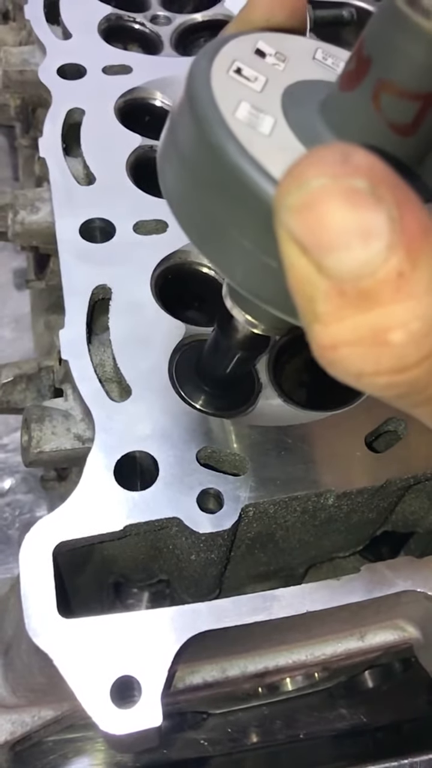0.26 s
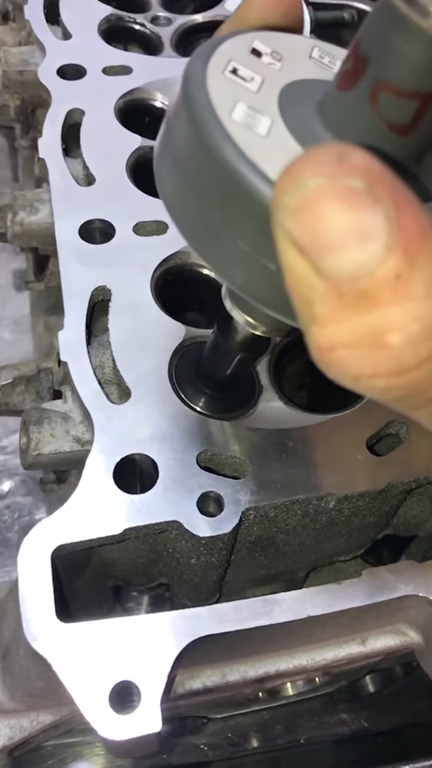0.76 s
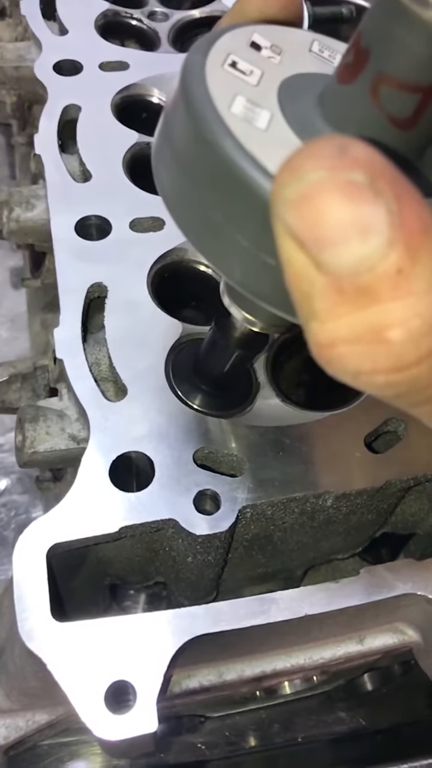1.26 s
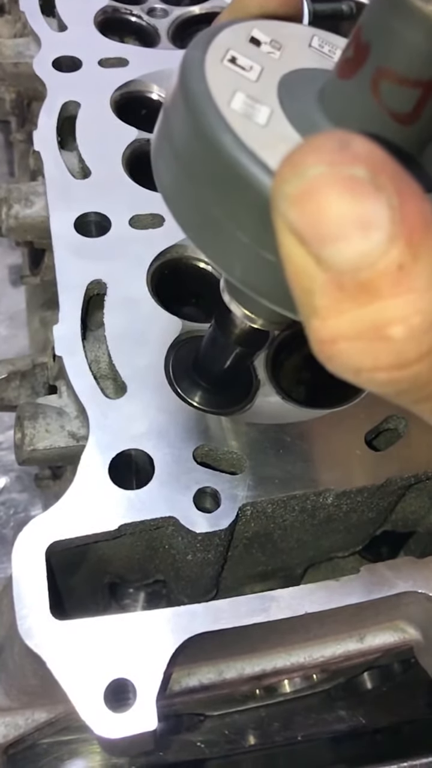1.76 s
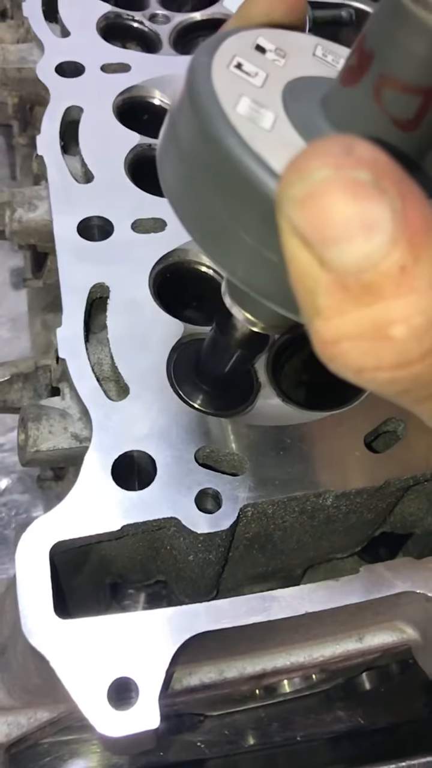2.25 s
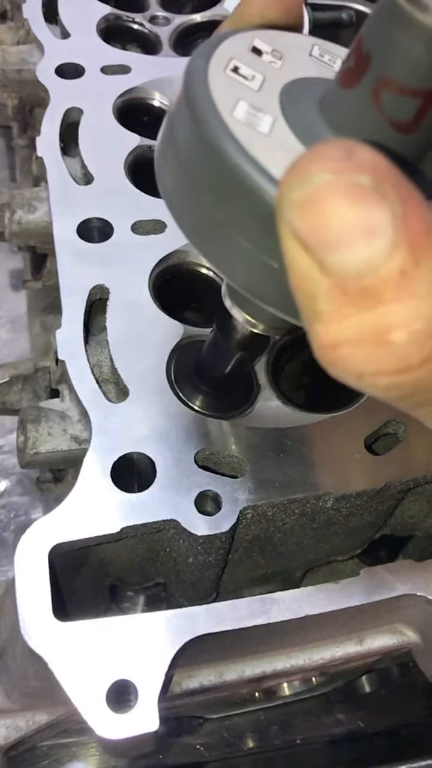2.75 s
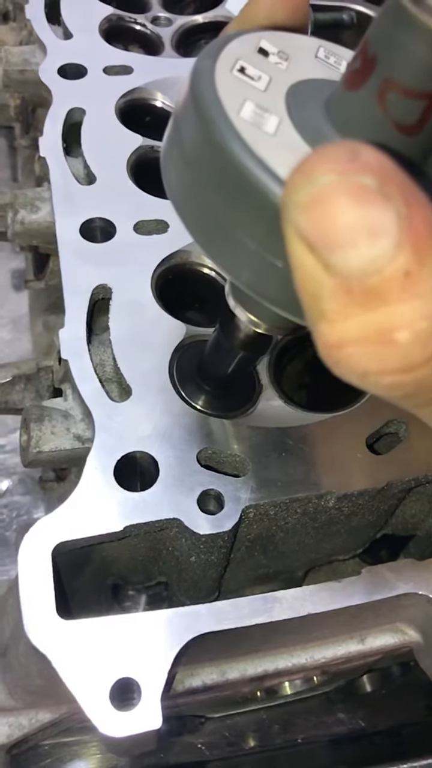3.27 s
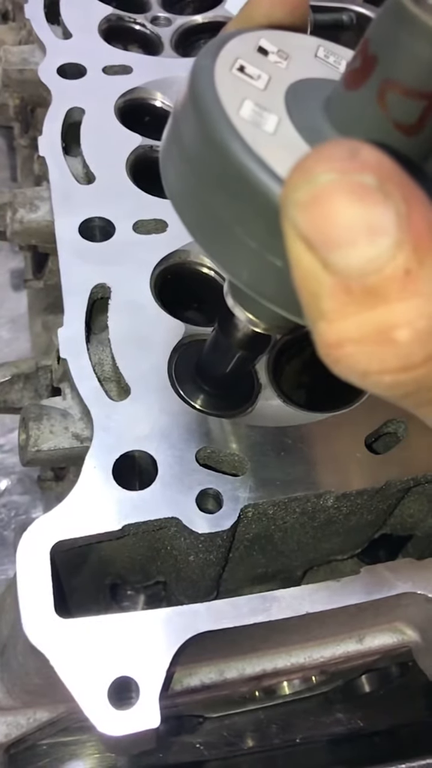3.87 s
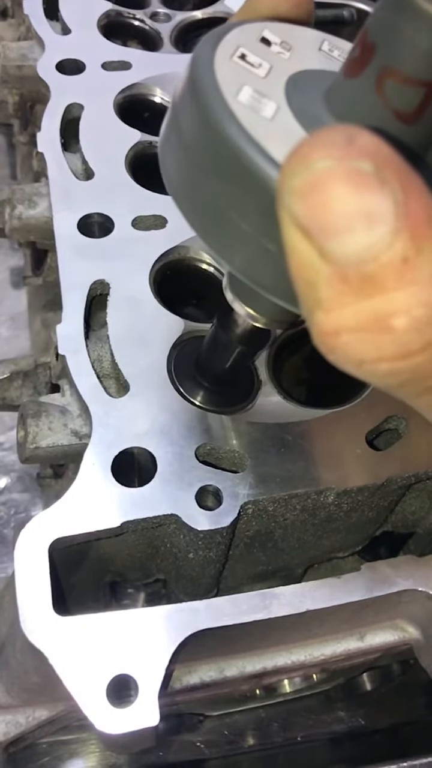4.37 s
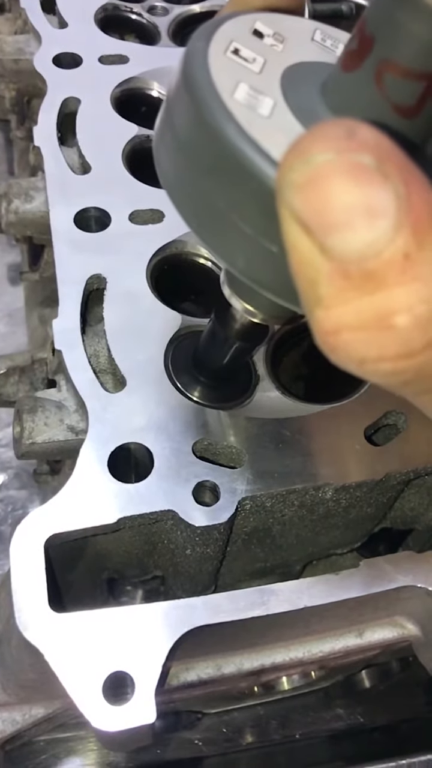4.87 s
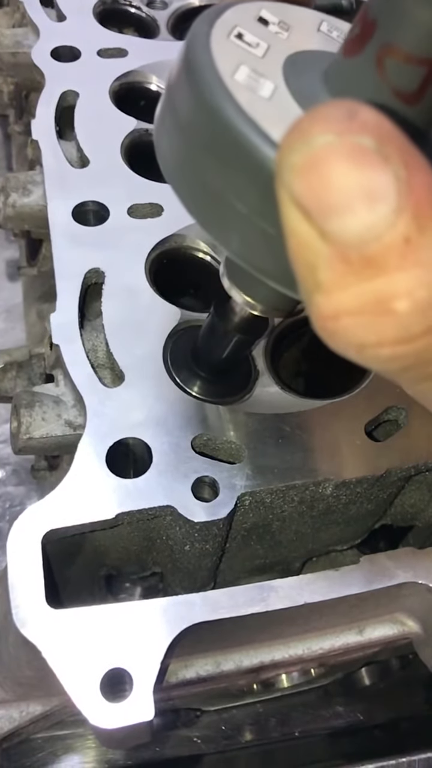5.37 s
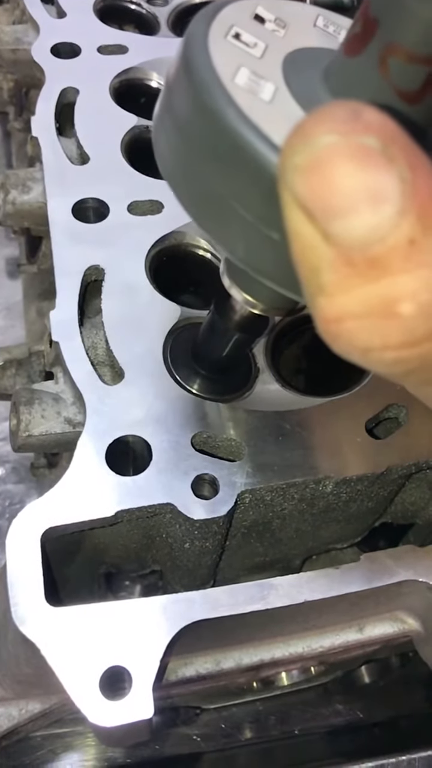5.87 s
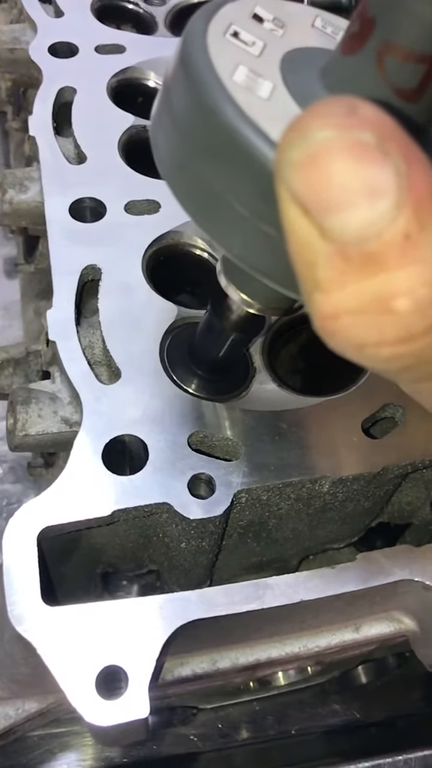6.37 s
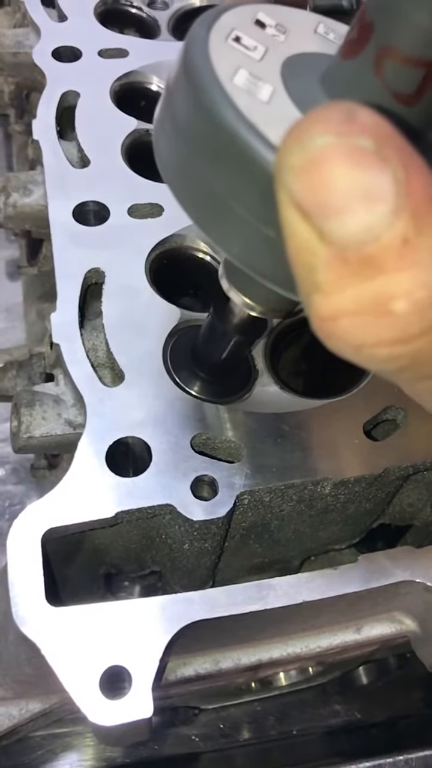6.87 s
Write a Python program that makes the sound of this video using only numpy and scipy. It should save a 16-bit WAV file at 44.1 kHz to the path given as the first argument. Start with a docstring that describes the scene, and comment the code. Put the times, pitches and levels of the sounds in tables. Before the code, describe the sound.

Muffled, slowed-sounding gear whirr and quick ticking over low grit grinding; after two seconds, irregular violent double knocks clack on heavy metal.

```python
"""A gear whirr with rapid ticks over a grinding that dies away, all dull as in slowed playback; then hard knocks.
A drill turns a lapping tool on an engine valve. Noise and taps ring the gear housing: whirr and ticks.
Uneven slips of grit push the valve seat, and finer grit rubs above; the grinding swells after each landing.
The tool's reversing cam knocks and rebounds, ringing the head; the hardest knocks reach full scale.
Shaking bench and workshop air lie underneath."""
import sys
import numpy as np
from scipy import signal
from scipy.fft import rfft, irfft, next_fast_len
from scipy.io import wavfile
from scipy.ndimage import uniform_filter1d, map_coordinates

SR = 44100
rng = np.random.default_rng(int(sys.argv[2]) if len(sys.argv) > 2 else 0)


def pcm_store(signal):
    """Save signal as 16-bit PCM."""
    levels = np.round(np.clip(np.atleast_2d(signal), -1, 1) * 32767)
    wavfile.write(sys.argv[1], SR, levels.astype(np.int16).T)


def amplitude_ratio(level_db):
    """Convert a level in decibels to the matching linear amplitude (field) ratio."""
    exponent = np.asarray(level_db, float) / 20
    return 10 ** exponent


N = 314433  # samples

# workshop air, noise colour: (frequency [Hz], density [dB per Hz])
AIR_SPECTRUM = [(12, -47), (20, -4.5), (329, -2.5), (562, 9), (699, -2.5), (887, -9.5), (1320, -20),
                (2120, -5.5), (2300, -19.5), (2990, -44), (5060, -120)]
# bench rumble, noise colour: (frequency [Hz], density [dB per Hz])
BENCH_SPECTRUM = [(15, -8.0), (30, -4), (50, 0), (80, 0.5), (110, -38), (200, -120)]
# drive shaft: (time [s], speed [turns/s])
SHAFT_SPEED = [(0, 12.78), (.848, 12.69), (1.898, 13.18), (2.248, 29.21), (2.398, 33.18), (2.948, 53.04),
               (3.398, 56.18), (3.548, 58.14), (4.048, 49.21), (4.648, 43.99), (5.098, 35.16),
               (5.598, 29.75), (5.898, 43.77), (6.198, 48.34), (6.898, 64.38), (7.13, 67.31)]
# gear contacts within one turn: (position [turns], level [dB])
GEAR_CONTACTS = [(0, 2.5), (0.33, -12), (0.601, -10.5)]
# modes of the gear housing: (frequency [Hz], width [Hz], level [dB])
HOUSING_MODES = [(780, 25, -1.5), (895, 19, -8), (1050, 160, -4.5), (1465, 36, -2.5), (1548, 71, -0.5),
                 (1905, 230, -4.5), (1949, 30, 2), (2091, 108, 1)]
# hand on the drill: (time [s], rub = pressure on the valve [dB], whirr drive [dB], tick over whirr [dB])
HAND_EFFORT = [(0, -34, -31, -3), (.28, -38.5, -36, -12), (.52, -43, -56.5, -1), (.95, -42, -47.5, 5),
               (1.5, -41.5, -39.5, 3), (1.86, -41.5, -40, 7), (2.08, -34.5, -40.5, 11.5),
               (2.22, -32.5, -38.5, 15), (2.33, -29, -29, 6), (2.72, -30, -35.5, 2.5),
               (2.94, -27.5, -29.5, 4.5), (3.22, -22, -29.5, 3.5), (3.58, -30, -29.5, 2),
               (3.85, -25, -28, 1.5), (4.06, -33.5, -35.5, 3), (4.3, -30, -31, 4.5), (4.92, -33, -37.5, 2),
               (5.22, -34.5, -35.5, 8), (5.6, -30.5, -32, -3), (6.04, -30, -35, -2.5),
               (6.31, -25, -30.5, 7), (6.63, -27.5, -26, -2), (6.74, -29.5, -36, 7), (6.9, -25, -26.5, -1),
               (7.13, -25, -27, 1.5)]
# grinding after the valve lands: (landing time [s], swell peak [dB], seat boom over swell [dB])
GRIND_SWELLS = [(2.259, -19.5, -10.5), (3.112, -16.5, -9), (3.76, -25, -6.5), (4.521, -25, 2),
                (5.538, -24, -9), (6.435, -16.5, -9), (7.05, -20.5, -3)]
# modes of the valve seat: (frequency [Hz], width [Hz], level [dB])
SEAT_MODES = [(107.4, 27, -0.5), (182.6, 21, 4.5), (228.3, 63.5, 1.5), (314, 186, -1), (465.6, 118, -2.5)]
# fine grit, noise colour: (frequency [Hz], density [dB per Hz])
RUB_SPECTRUM = [(150, -27.5), (250, -6.5), (323, -2), (498, 0.5), (606, 1.5), (736, 0), (1270, -7),
                (1500, -7), (1950, -47.5), (3300, -120)]
# modes of the valve stem, singing under the grit: (frequency [Hz], width [Hz], level [dB])
STEM_MODES = [(402, 19, -4), (576.7, 32, 5.5), (717.5, 28, -4.5), (757, 6.4, 4.5), (855, 4.2, 7),
              (1053, 25, 5.5)]
# knocks and rebounds: (time [s], peak [dB], hardness [0-1], t60 of the rattle force [s])
CAM_KNOCKS = [(0.903, -23, 0, 0.06), (2.247, -23, 0.8, 0.092), (2.2602, 0.24, 0.94, 0.033),
              (2.272, -9, 0.07, 0.11), (3.1124, 1, 1, 0.078), (3.126, -2, 0.14, 0.046),
              (3.144, -7, 0.82, 0.085), (3.3601, -0.45, 0.88, 0.053), (3.375, -6.5, 0.6, 0.078),
              (3.397, -15, .55, 0.068), (3.7613, -0.5, 0.97, 0.051), (3.769, -5, .4, 0.011),
              (3.78, -8.5, 0.43, 0.1), (3.805, -22, 0.4, .04), (4.0359, -1.65, 0.87, 0.04),
              (4.048, -6.5, 0.7, 0.048), (4.055, -7, 0.76, 0.12), (4.077, -13.5, 0.83, 0.053),
              (4.5197, -2.5, 0.87, 0.072), (4.536, -8.5, 0.28, 0.18), (5.5373, -4.5, 1, 0.028),
              (5.548, -4.5, 0.04, 0.053), (6.4364, -.5, 0.78, 0.094), (6.451, -1, 0.72, 0.052),
              (6.462, -13.5, 0.58, 0.39), (6.6893, 0.1, 0.87, 0.071), (6.707, -8, 0.77, 0.096),
              (6.727, -11.5, 0.5, 0.038), (7.048, -1, 0.78, 0.062), (7.06, -2, 0.1, 0.12),
              (7.074, -9, 1, 0.13), (7.09, -14.5, .9, 0.031)]
# modes of the head before weighting by hardness: (frequency [Hz], width [Hz], level [dB])
HEAD_MODES = [(277, 192, 4.5), (363.3, 97, 11), (527, 94, 6), (798, 195, -3.5), (861, 134, 3),
              (1132, 100, -5), (1304, 110, -4), (1389, 110, 1), (1590, 280, -2), (2110, 138, 2)]
# short snap of the contact itself, at hardness 0: (frequency [Hz], width [Hz], level [dB])
SNAP_MODES = [(790, 650, -11), (1740, 1700, -27.5)]

BAND_LIMIT_HZ = 2304.6
AIR_DB = -44.5
BENCH_DB, BENCH_DB_PER_GRIND_DB, BENCH_SWAY_DB, BENCH_EVEN_S = -39.5, 0.45, 2.5, 0.054
START_TURNS = 0.275
TICK_MASK_DB_PER_DB = 0.8  # gears held tight under a swell tick less
SWELL_DELAY_TURNS, SWELL_ROUND_TURNS = 8.98, 0.97  # landing to peak; rounding of the peak
RISE_DB_PER_TURN, FALL_DB_PER_TURN = 2.5, 2.75  # slopes away from the rounded peak
LIFT_TURNS, LIFT_DB = 7.5, -3.5  # the valve hangs light around each landing
GRIND_DB, GRIND_DB_PER_RUB_DB = -31.5, 0.77  # between swells, at mean pressure
SETTLE_DB, SETTLE_S = -34.5, 0.71  # earlier grinding dying away: start level, time constant
ENGAGE_S, ENGAGE_RISE_S, IDLE_DB = 1.92, 0.03, -9.5  # trigger squeezed, valve bites; lighter before
SOFT_THUD_DB, HARD_THUD_DB = 0, -21.5  # weight of the low head modes
SOFT_CLACK_DB, HARD_CLACK_DB = -30.5, -2  # weight of the high head modes
SNAP_DB_PER_HARDNESS = 8


def unit(x):
    """Scaled to rms 1."""
    return x / np.sqrt(np.mean(x ** 2) + 1e-20)


def curves(rows):
    """One value per sample for each column after the time."""
    time_s, *columns = np.transpose(rows)
    return [np.interp(np.arange(N) / SR, time_s, column) for column in columns]


def wobble(knots_per_s):
    """Smooth random curve through normally distributed knots."""
    knots = rng.standard_normal(int(N * knots_per_s / SR) + 4)
    return map_coordinates(knots, [np.arange(N) * knots_per_s / SR])


def filtered(x, response):
    """x filtered by a complex response of frequency in Hz."""
    size = next_fast_len(x.shape[-1] + 8192)
    spectrum = rfft(x, size) * response(np.fft.rfftfreq(size, 1 / SR))
    return irfft(spectrum, size)[..., :x.shape[-1]]


def modes(rows):
    """Causal response of resonances in parallel, with alternating sign."""
    def response(f):
        total = 0
        for k, (hz, width_hz, db) in enumerate(rows):
            damping = 1j * f * width_hz
            total = total + (-1) ** k * amplitude_ratio(db) * damping / (hz * hz - f * f + damping)
        return total
    return response


def hiss(spectrum):
    """Noise of rms 1 with the given colour, interpolated over log frequency."""
    hz, db = np.transpose(spectrum)
    noise = rng.standard_normal(N)
    return unit(filtered(noise, lambda f: amplitude_ratio(np.interp(np.log(f + 1), np.log(hz + 1), db))))


def bursts(at, gain, t60_s):
    """Envelope that jumps at the given samples and dies away."""
    tail = amplitude_ratio(-60 * np.arange(SR // 10) / SR / t60_s)
    return signal.fftconvolve(np.bincount(at, gain, N + SR)[:N], tail)[:N]


def steadied(x, seconds):
    """x with its level evened out to rms 1 by two running means of its power."""
    size = int(seconds * SR)
    power = uniform_filter1d(uniform_filter1d(x * x, size), size)
    return x / np.sqrt(np.abs(power) + 1e-12)


def turns():
    """Shaft turns made so far, per sample: the integral of speed."""
    return START_TURNS + np.cumsum(curves(SHAFT_SPEED)[0]) / SR


def swells():
    """Gains of the grinding swells and their boom, timed in turns after landing, and of the lift around it."""
    made = turns()
    swell, boom, lift_db = np.zeros(N), np.zeros(N), np.zeros(N)
    for landing_s, peak_db, boom_db in GRIND_SWELLS:
        since = made - made[round(landing_s * SR)]
        late = since - SWELL_DELAY_TURNS
        slope = np.where(late < 0, RISE_DB_PER_TURN, FALL_DB_PER_TURN)
        distance = np.hypot(late, SWELL_ROUND_TURNS) - SWELL_ROUND_TURNS
        gain = amplitude_ratio(peak_db - slope * distance)
        swell += gain
        boom += amplitude_ratio(boom_db) * gain
        lift_db += LIFT_DB * np.exp(-(since / LIFT_TURNS) ** 2)
    return swell, boom, amplitude_ratio(lift_db)


def workshop_air():
    """Steady coloured noise of the room."""
    return amplitude_ratio(AIR_DB) * hiss(AIR_SPECTRUM)


def bench(grind_db):
    """Low noise of the bench, which shakes with the grinding and sways in level."""
    follow_db = BENCH_DB_PER_GRIND_DB * (grind_db - grind_db.mean())
    level_db = BENCH_DB + follow_db + BENCH_SWAY_DB * wobble(8.6)
    return amplitude_ratio(level_db) * steadied(hiss(BENCH_SPECTRUM), BENCH_EVEN_S)


def drive(whirr_db, tick_db):
    """Gears whirr in the housing; each contact of the turn adds a tap and a short burst of rattle."""
    made = turns()
    whole = np.arange(made[-1])
    rattle, taps = np.zeros(N), np.zeros(N + 1)
    for position, db in GEAR_CONTACTS:
        at = np.searchsorted(made, whole + position)
        size = amplitude_ratio(db + 0.5 * rng.standard_normal(len(at)))
        rattle += bursts(at, size, t60_s=0.018)
        taps[at] += 7.1 * size

    whirr = amplitude_ratio(-1.5 + 0.48 * wobble(25)) * rng.standard_normal(N)
    # fine gears reach only the high modes
    whirr = filtered(whirr, lambda f: 1 / (1 + (1250 / (f + 1)) ** 4))
    ticks = amplitude_ratio(tick_db) * (taps[:N] + rattle * rng.standard_normal(N))
    # ticks shake the low modes harder
    ticks += 2 * amplitude_ratio(-5) * filtered(ticks, lambda f: 1 / (1 + (f / 1300) ** 4))

    housing = modes(HOUSING_MODES)
    noise_rms = np.std(filtered(rng.standard_normal(N), housing))
    return amplitude_ratio(whirr_db) * filtered(whirr + ticks, housing) / noise_rms


def grind(grind_db, rub_db, boom):
    """Grit slips at an uneven rate and pushes the seat, hardest at 0.3 turn; finer grit rubs above."""
    slips_made = np.cumsum(117 * amplitude_ratio(1.5 * wobble(40))) / SR
    slips = np.flatnonzero(np.diff(np.floor(slips_made)))
    pushes = np.zeros(N)
    pushes[slips] = amplitude_ratio(4.2 * rng.standard_normal(len(slips)))
    load = amplitude_ratio(1.5 * np.cos(2 * np.pi * (turns() - 0.3)))
    rough = load * (unit(pushes) + 0.71 * rng.standard_normal(N))

    seat = modes(SEAT_MODES)
    low = filtered(rough, lambda f: seat(f) / (1 + 1j * f / 600) ** 2)
    low = steadied(low, seconds=0.097)  # evens out the level of the low grinding
    deep = steadied(filtered(low, modes(SEAT_MODES[:1])), seconds=0.031)

    stem = modes(STEM_MODES)
    rub = filtered(amplitude_ratio(1.5 * wobble(45)) * hiss(RUB_SPECTRUM), lambda f: 1 + stem(f))
    return amplitude_ratio(grind_db) * low + boom * deep + amplitude_ratio(rub_db) * unit(rub)


def knocks():
    """Blow and dying rattle ring the head under a snap; hardness trades low thud for high clack."""
    out, t = np.zeros(N + SR), np.arange(SR // 6) / SR
    blow = np.exp(-(t / 0.0002 - 2) ** 2)
    blow = blow / blow.sum()
    for time_s, peak_db, hard, t60_s in CAM_KNOCKS:
        thud_db = SOFT_THUD_DB + hard * (HARD_THUD_DB - SOFT_THUD_DB)
        clack_db = SOFT_CLACK_DB + hard * (HARD_CLACK_DB - SOFT_CLACK_DB)
        head = []
        for hz, width_hz, db in HEAD_MODES:
            weight_db = np.interp(hz, [345.6, 700, 1100, 1560], [thud_db, 0, 0, clack_db])
            head.append((hz, width_hz, db + weight_db))

        rattle = 0.052 * amplitude_ratio(-60 * t / t60_s) * rng.standard_normal(len(t))
        snap = amplitude_ratio(SNAP_DB_PER_HARDNESS * hard) * filtered(blow, modes(SNAP_MODES))
        sound = filtered(rattle - blow, modes(head)) + snap
        sound = filtered(sound, lambda f: (f < BAND_LIMIT_HZ) / (1 + 1j * f / 3000) ** 2)
        # soft limiting brings the highest swings closer together
        sound = np.tanh(0.96 * sound / np.abs(sound).max())
        start = round(time_s * SR)
        out[start:start + len(t)] += amplitude_ratio(peak_db) * sound / np.abs(sound).max()
    return out[:N]


def scene():
    """Air, bench, drive, grinding and knocks, summed to one channel."""
    rub_db, whirr_db, tick_db = curves(HAND_EFFORT)
    swell, boom, lift = swells()
    t = np.arange(N) / SR
    idle_db = IDLE_DB / (1 + np.exp(np.clip((t - ENGAGE_S) / ENGAGE_RISE_S, -50, 50)))
    pressure_db = GRIND_DB_PER_RUB_DB * (rub_db - rub_db.mean())
    settling = amplitude_ratio(SETTLE_DB) * np.exp(-t / SETTLE_S)
    steady = lift * amplitude_ratio(GRIND_DB + idle_db + pressure_db) + settling
    grind_db = 20 * np.log10(steady + swell)
    swell_excess_db = grind_db - 20 * np.log10(steady)
    tick_db = tick_db - TICK_MASK_DB_PER_DB * swell_excess_db

    background = workshop_air() + bench(grind_db)
    tool = drive(whirr_db, tick_db) + grind(grind_db, rub_db, boom) + knocks()
    return (background + tool)[None]


def band_limit(x):
    """A steep low-pass at the top of the band."""
    return signal.sosfilt(signal.butter(12, 3240, fs=SR, output="sos"), x)


def record(dry):
    """Slowed playback ends at the band limit, a steep low-pass."""
    mix = filtered(dry, lambda f: 1 / (1 + np.exp(np.clip((f - BAND_LIMIT_HZ) / 12, -50, 50))))
    return band_limit(mix)


dry = scene()
out = record(dry)
pcm_store(out)
```